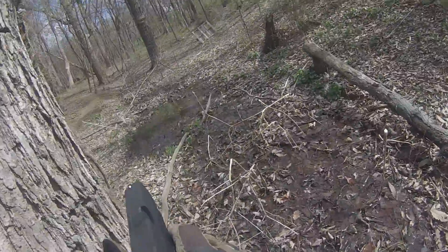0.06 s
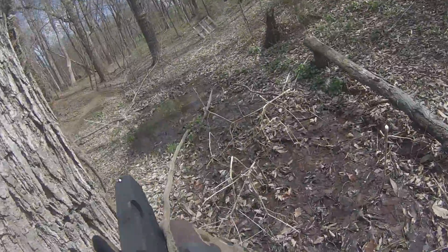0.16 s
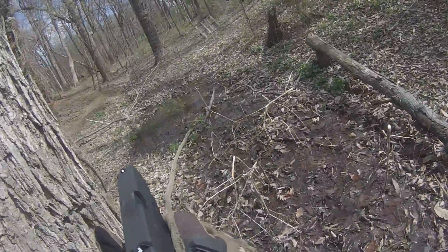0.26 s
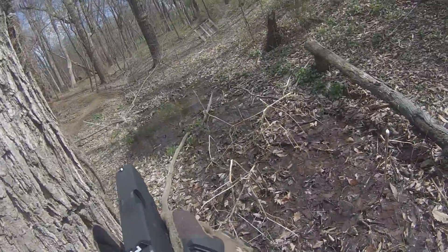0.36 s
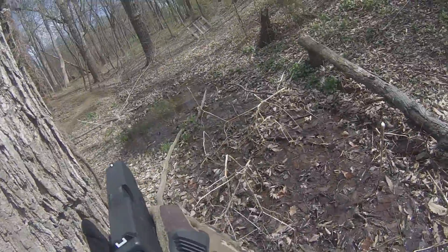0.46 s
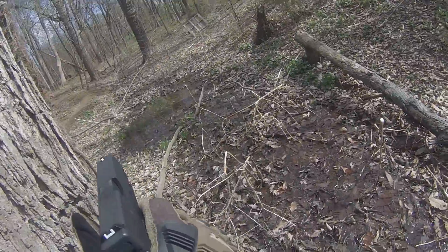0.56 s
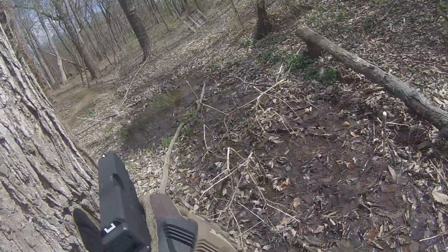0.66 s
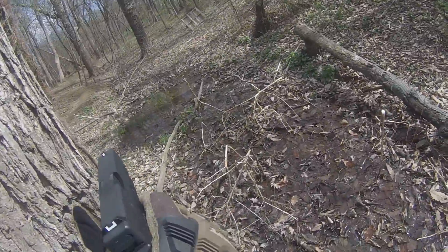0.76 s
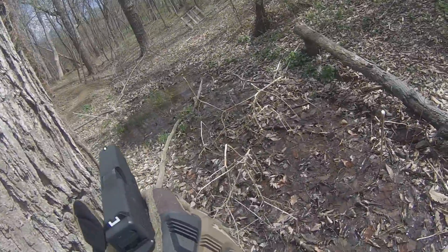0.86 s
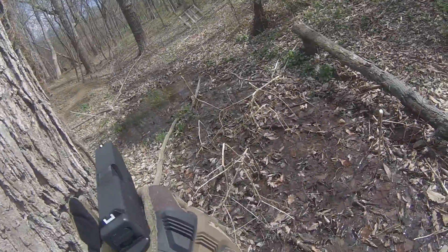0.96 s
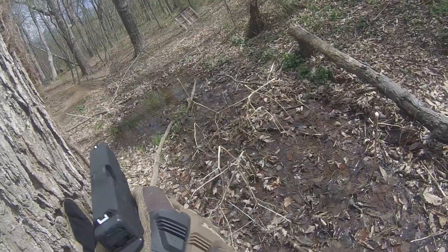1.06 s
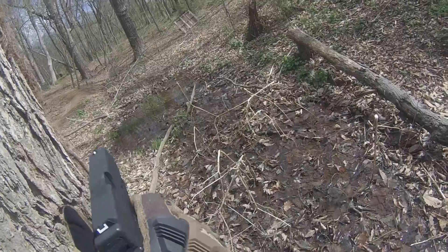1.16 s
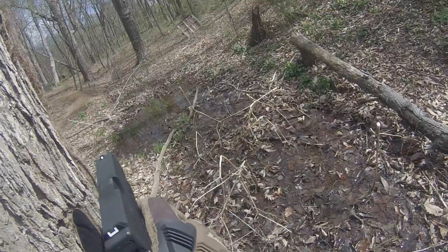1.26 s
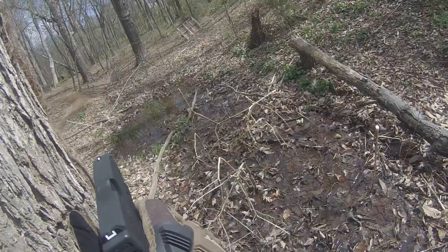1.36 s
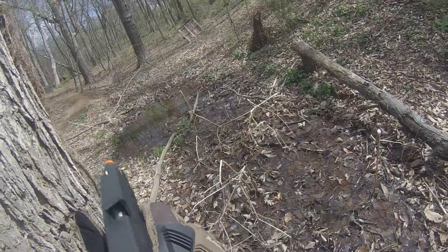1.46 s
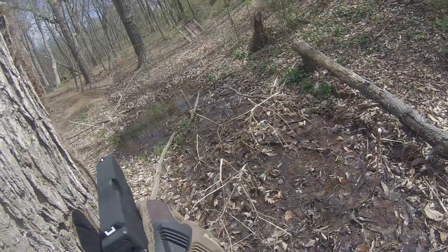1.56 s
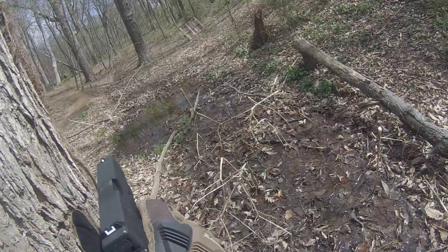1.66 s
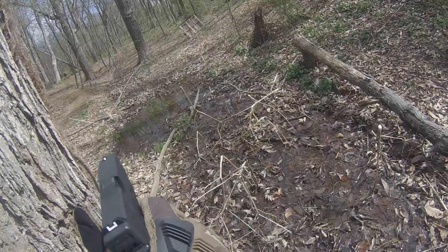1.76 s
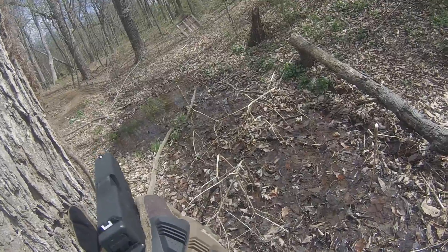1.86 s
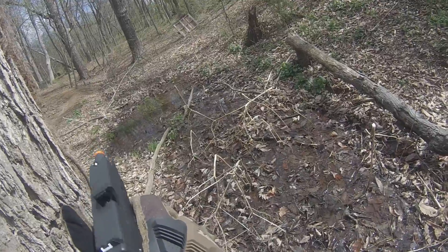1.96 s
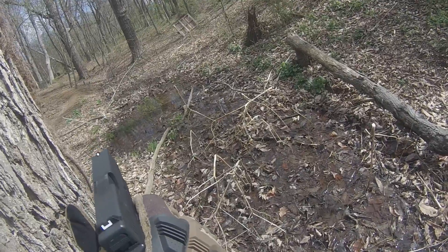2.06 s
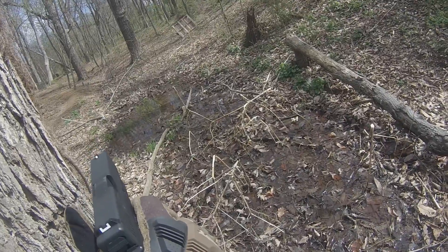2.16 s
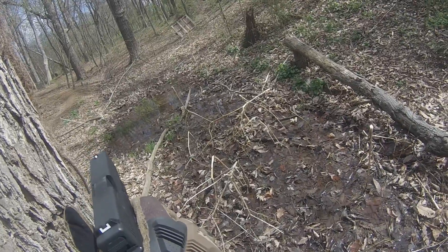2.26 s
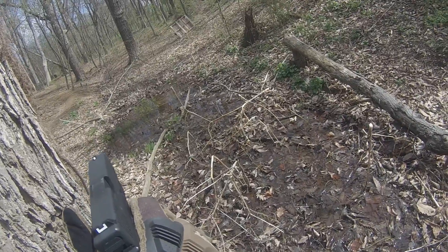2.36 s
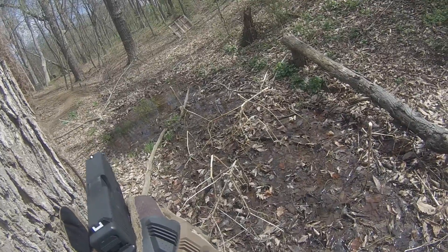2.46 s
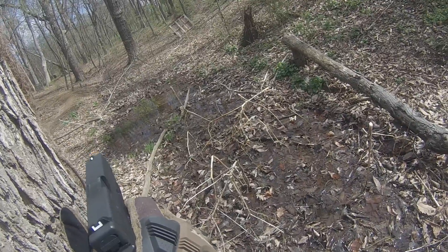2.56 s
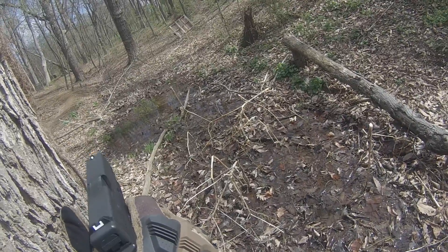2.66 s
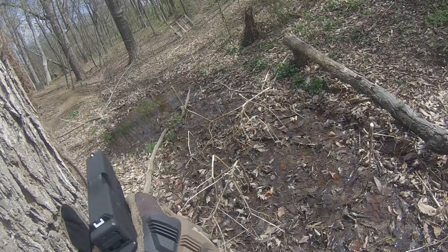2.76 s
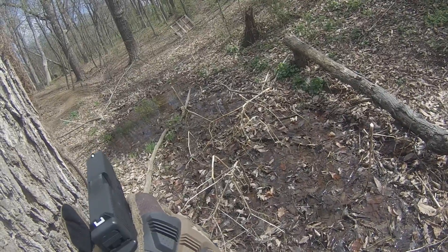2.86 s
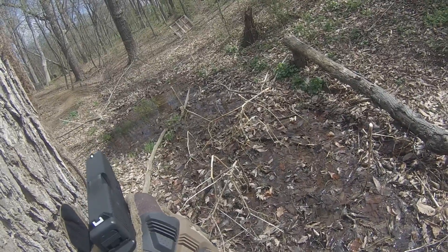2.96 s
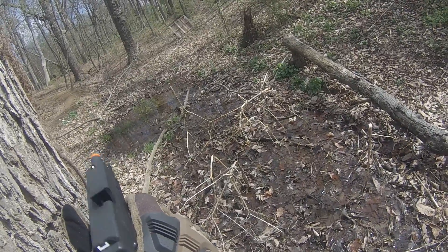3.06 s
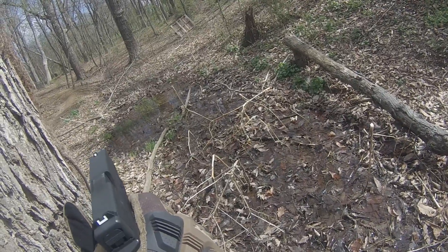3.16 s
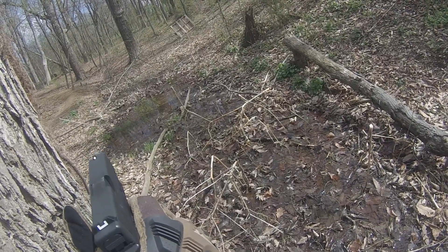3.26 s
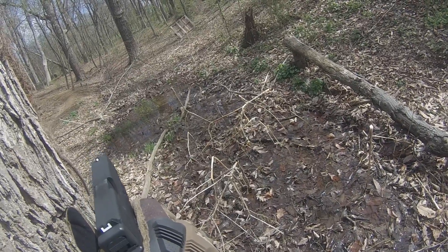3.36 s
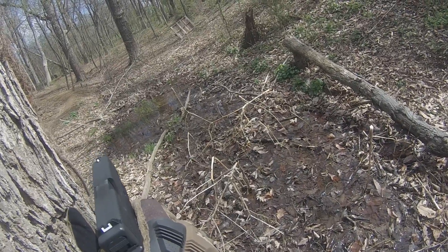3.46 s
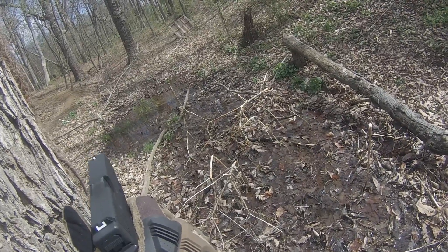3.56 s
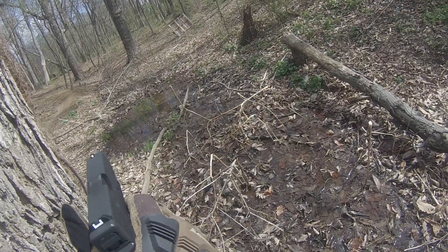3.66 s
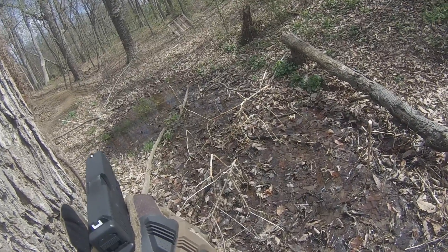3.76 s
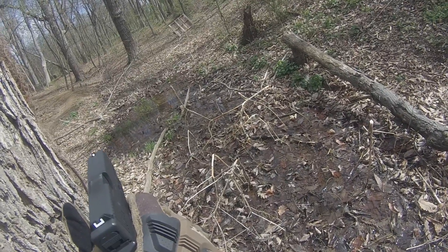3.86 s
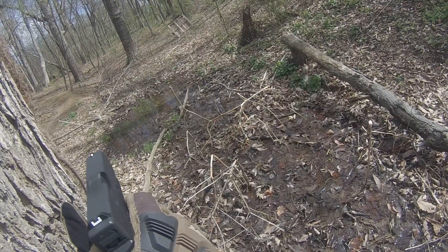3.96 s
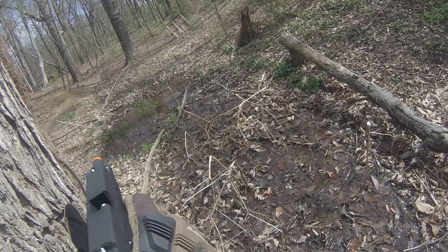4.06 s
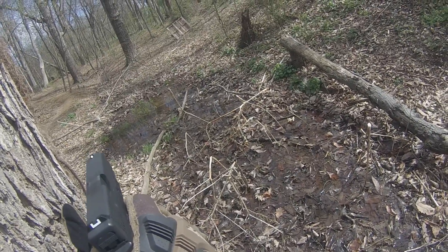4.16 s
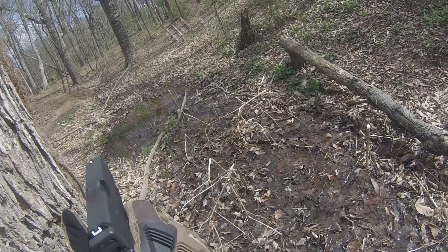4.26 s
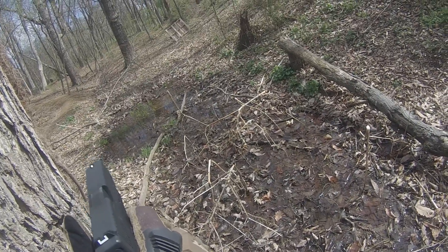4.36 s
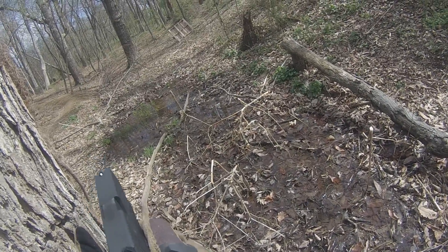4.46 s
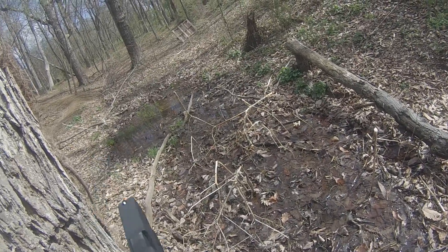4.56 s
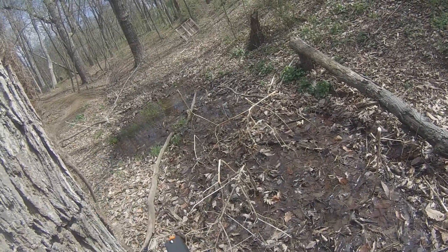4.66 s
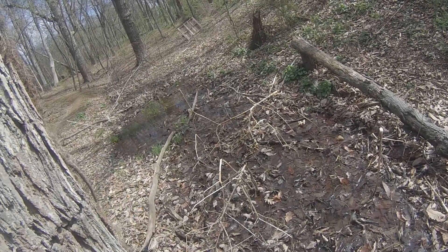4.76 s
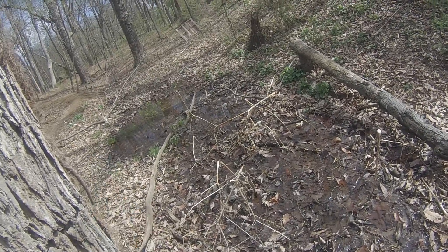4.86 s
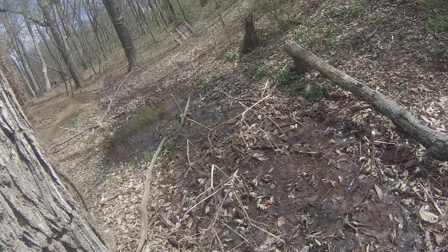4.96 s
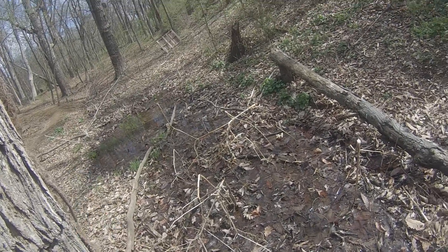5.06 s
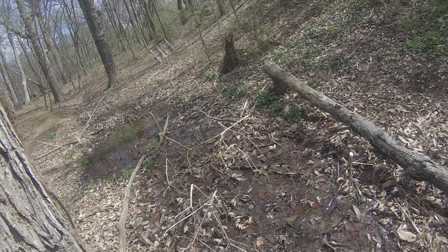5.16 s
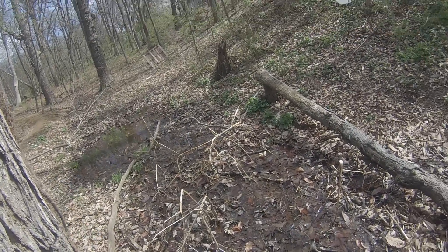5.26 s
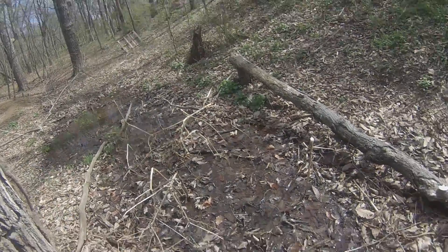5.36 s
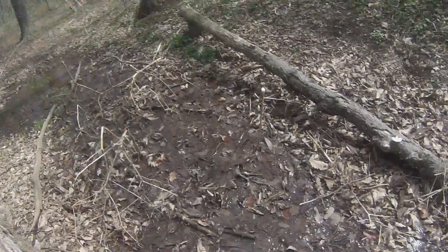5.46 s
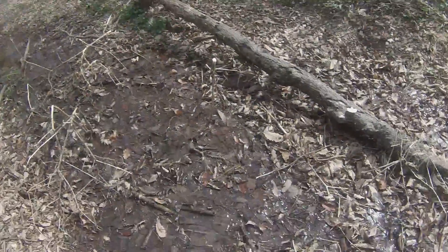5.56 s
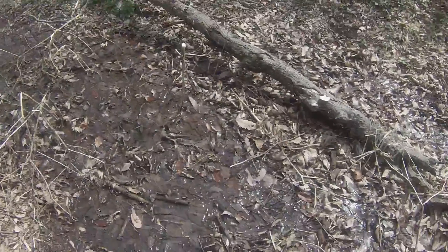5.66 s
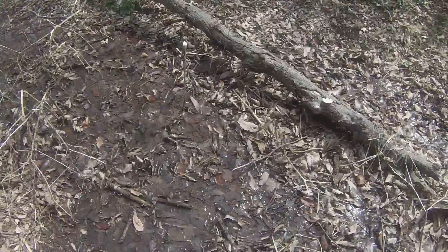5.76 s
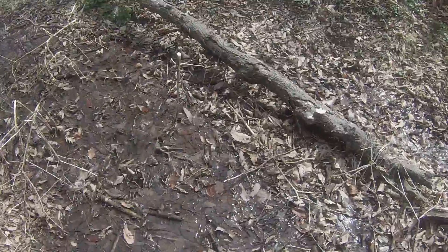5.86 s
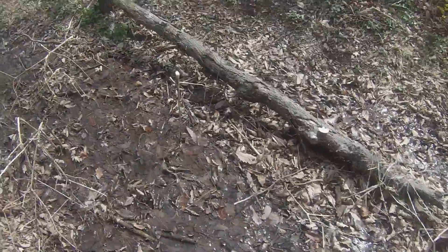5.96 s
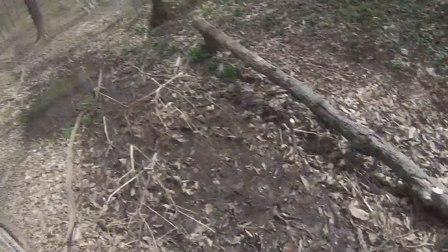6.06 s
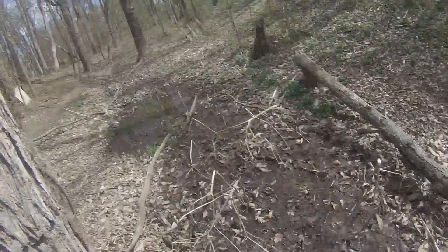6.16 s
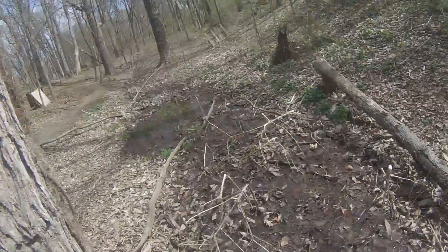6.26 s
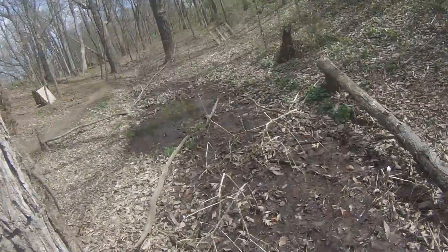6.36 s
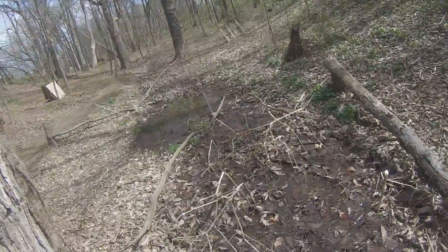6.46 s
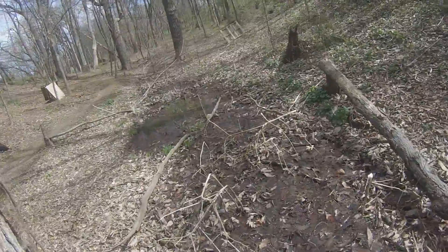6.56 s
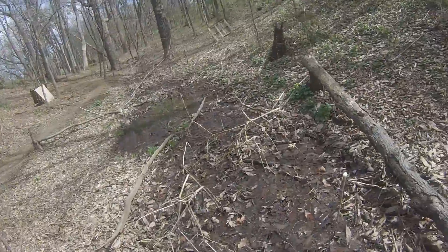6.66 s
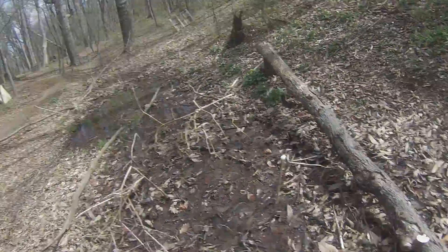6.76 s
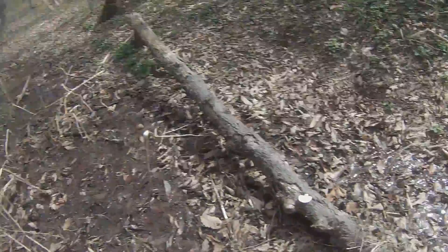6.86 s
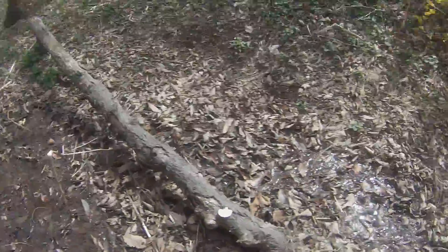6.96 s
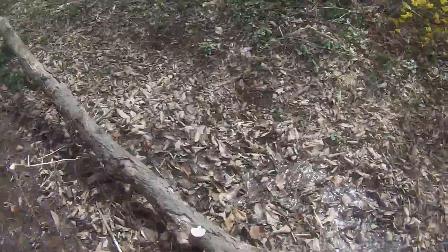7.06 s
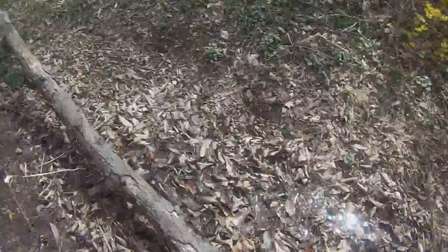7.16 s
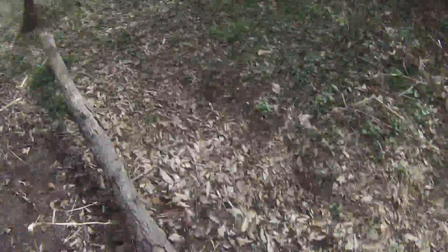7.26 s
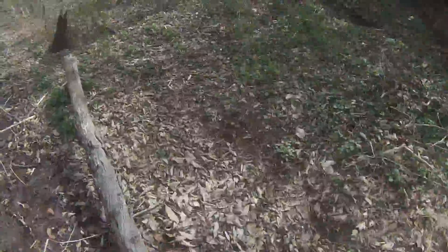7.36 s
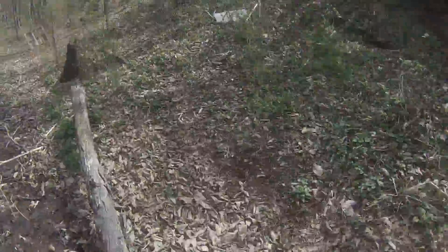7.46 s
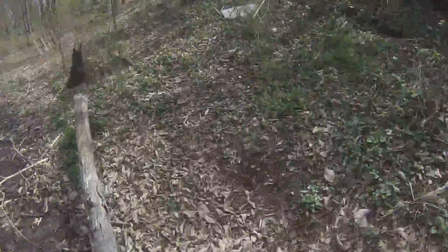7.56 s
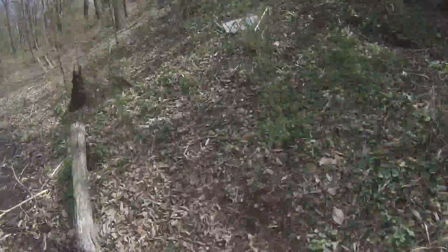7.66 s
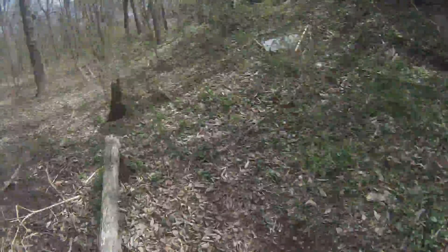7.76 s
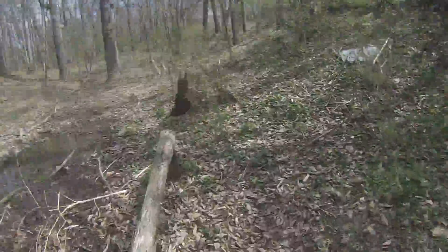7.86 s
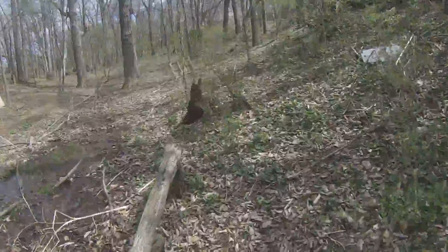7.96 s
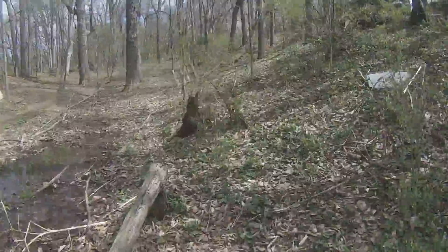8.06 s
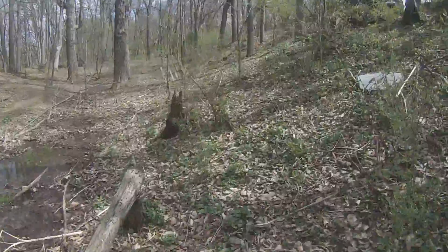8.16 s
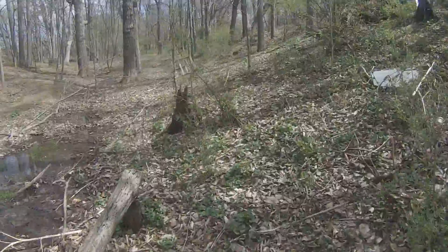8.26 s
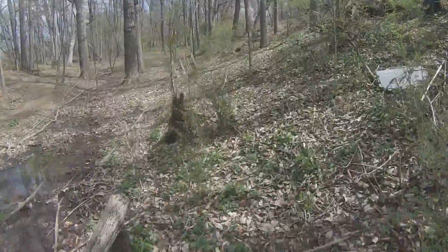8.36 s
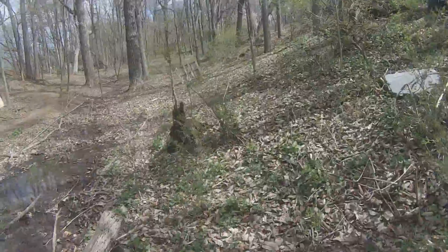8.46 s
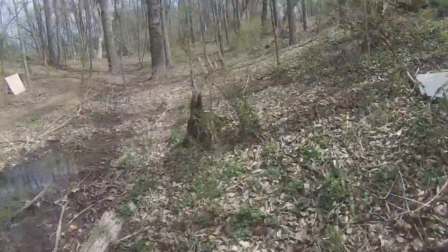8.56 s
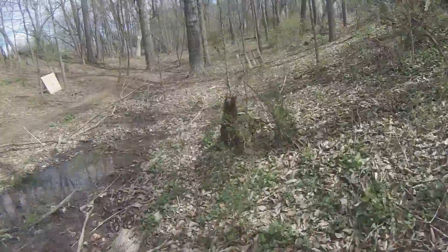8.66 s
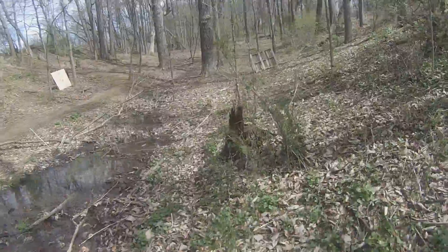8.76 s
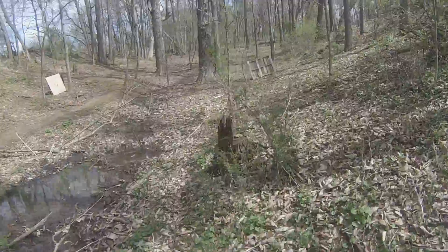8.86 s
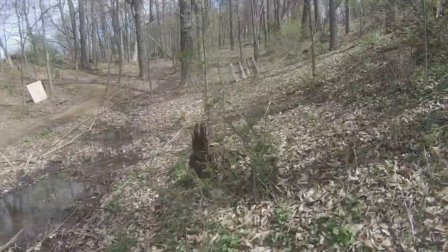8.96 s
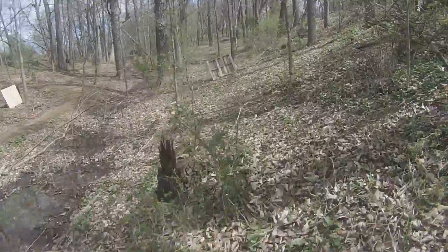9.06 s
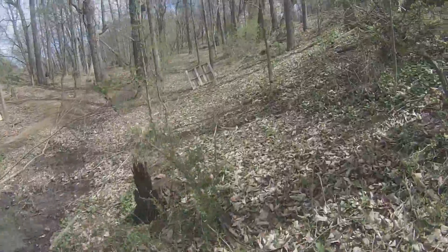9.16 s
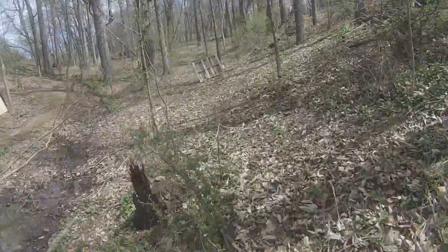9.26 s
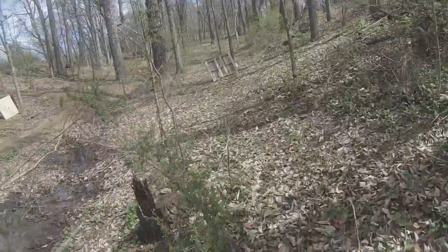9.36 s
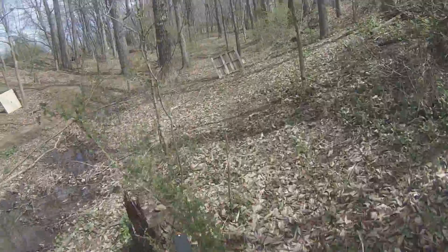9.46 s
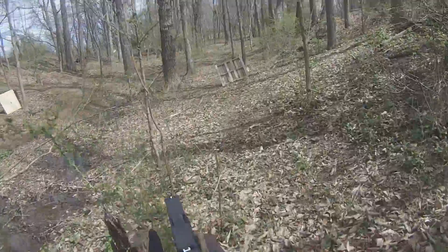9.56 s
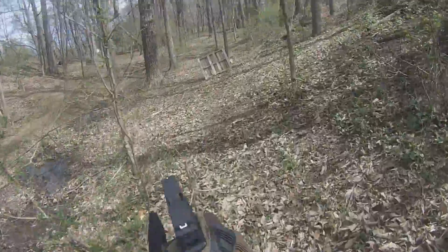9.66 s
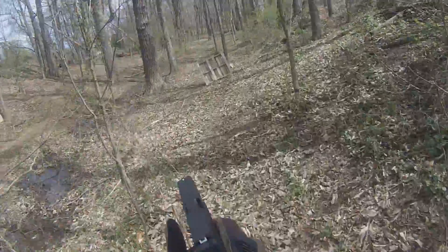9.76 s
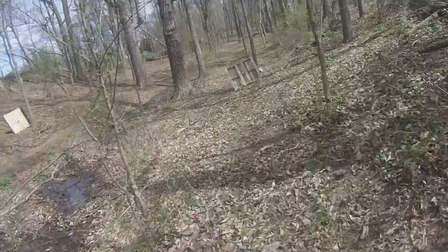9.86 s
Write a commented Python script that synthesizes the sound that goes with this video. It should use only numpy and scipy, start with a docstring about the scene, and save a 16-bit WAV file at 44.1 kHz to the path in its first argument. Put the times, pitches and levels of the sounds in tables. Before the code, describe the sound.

Close to a body-worn microphone, gear knocks softly before a gas pistol pops six times over about three seconds, its slide clacking quickly after each pop and the trees returning a very faint tail. Dry clicks intrude. Then cloth scrapes, leaves crackle underfoot and hard gear bangs and rattles with running strides, heavy and distorted to the end.

```python
"""Light knocks of worn gear and dry ticks come first, then a gas airsoft pistol fires six shots from behind a tree.
Each shot is a gas pop and two clacks of the slide: noise bursts through resonances, with a faint answer from the woods.
The player then runs off over dry leaves: micro-slips crackle and rub, and jolts set worn gear thumping and clattering
against the body-worn microphone. Electric-sounding ticks are flat pulses on a strict beat; woodland air is steady noise."""
import sys
import numpy as np
from scipy import signal
from scipy.fft import rfft, irfft
from scipy.io import wavfile
from scipy.ndimage import uniform_filter1d

SR = 44100
rng = np.random.default_rng(int(sys.argv[2]) if len(sys.argv) > 2 else 0)


def store_wav(level_fs):
    """Save 16-bit WAV to argv[1]."""
    pcm = np.round(np.clip(np.atleast_2d(level_fs), -1, 1) * 32767)
    wavfile.write(sys.argv[1], SR, pcm.T.astype(np.int16))


N = 437031
HIT = np.arange(8192) / SR  # time since a blow, s
TIME = np.arange(N) / SR  # time in the scene, s

# Pistol shots. Each row: start in seconds, gas pop in dB, delay of the slide's rear stop in ms and its level in dB,
# delay of the slide slamming shut in ms and its level in dB, metal ring in dB, nominal recoil clack of the gear in dB.
SHOTS = [(1.1147, -11, 9.9, -14, 57.7, -21.5, -47, -25),
         (1.4734, -10.5, 12.3, -16.5, 56.3, -22.5, -43, -25.5),
         (1.9514, -12, 12.8, -17.5, 55, -21.5, -41.5, -31.5),
         (2.518, -11, 12.9, -17.5, 51.2, -20, -48, -30.5), (3.0610, -12, 14, -20, 47.3, -24, -27, -27.5),
         (4.0350, -13, 13, -19, 50.3, -23, -45, -38)]
# Spectrum of the closing slide, also lent to the pellets. Each row: frequency in Hz, relative level in dB.
SHUT_SPECTRUM = [(200, -23.5), (700, -21.5), (1100, -12.5), (1600, -9.5), (2400, -4.5), (3600, -1.5),
                 (4700, -2), (6500, -9), (8200, -13.5), (10000, -5), (11800, -19.5), (12800, -10.5),
                 (14000, -19.5), (16000, -26.5)]
# Resonances of the plastic housing. Each row: nominal frequency in Hz, width in Hz, nominal level in dB.
HOUSING = [(246, 136, 8), (472, 300, -4), (726, 46, 6.5), (954, 460, 0.5), (1168, 250, 4), (1276, 87, 3.5),
           (1625, 84, -8.5), (2124, 110, 5), (3020, 210, -5), (3600, 500, -23)]
# Spectrum of scraping straps and cloth. Each row: frequency in Hz, relative level in dB.
SCRAPE_SPECTRUM = [(150, -16.5), (700, -5.5), (1150, 2), (1650, 7.5), (2200, 4.5), (2600, -5.5), (3100, -4),
                   (4000, -26.5), (6000, -29.5), (14000, -44.5)]
# Strides, the first three only shifts of weight. Each row: start in seconds, length in seconds, then levels in dB
# of leaves, rubbing gear, low sway and ticking.
STRIDES = [(5.886, 0.38, -74, -63.5, -53, -43.5), (6.733, 0.096, -69, -55, -39, -32.5),
           (6.97, 0.21, -58, -62, -55, -23.5), (7.221, 0.3, -59, -48, -35, -23),
           (7.597, 0.34, -55.5, -45.5, -36.5, -31.5), (8.001, .21, -58.5, -46, -33, -19.5),
           (8.361, 0.17, -58.5, -49, -36.5, -23), (8.741, .125, -50.5, -46.5, -32, -17.5),
           (9.083, 0.24, -47, -48, -37.5, -19), (9.465, 0.2, -55.5, -45.5, -34.5, -27.5),
           (9.838, 0.073, -54.5, -43, -39, -24.5)]
STRIDE_ATTACK_S, STRIDE_RELEASE_S = 0.011, 0.025
TICK_BEAT_S, TICK_START_S = 1024 / 48000, 0.7876  # spacing of the beats; start of the beat grid
TICK_WIDTH_MS = 0.24  # typical width of the lesser ticks


def pistol():
    """Impulsive excitation of resonators: the hammer strikes the valve, gas throws the slide back, a spring shuts it."""
    # Spectrum of gas leaving the barrel. Each row: frequency in Hz, relative level in dB.
    pop_spectrum = [(88, -47), (150, -18.5), (871, -24), (1600, -8.5), (1980, -21), (2360, -3), (3290, -3),
                    (4000, -10.5), (4670, -8), (5250, -18.5), (5680, -12.5), (8230, -13), (11500, -18.5),
                    (13200, -24), (16000, -39.5)]
    # Resonances of barrel and gas chamber. Each row: frequency in Hz, width in Hz, level in dB.
    barrel = [(262, 180, 0.5), (2350, 540, -0.5), (3114, 300, 0), (3600, 480, -4), (4680, 530, 2),
              (5630, 160, 4), (6370, 72, 1.5), (7270, 240, -1), (8850, 410, -4.5), (10800, 2400, -1),
              (12650, 500, -6)]
    # Spectrum of the slide at its rear stop. Each row: frequency in Hz, relative level in dB.
    rear_spectrum = [(88, -48), (150, -16.5), (805, -10), (1630, -8), (2020, -10.5), (3490, 1.5),
                     (3920, -7.5), (4760, -8), (5150, -11.5), (6140, -11.5), (8400, -18.5), (10200, -12.5),
                     (11500, -22.5), (14500, -26), (16000, -47)]
    # Ringing metal of the slide. Each row: nominal frequency in Hz, relative level in dB, t60 in seconds.
    metal = [(3547, -4, .1), (4317, -8.5, 0.1), (5460, -2.5, 0.07), (6800, -2, 0.063), (10000, -1.5, 0.069),
             (10337, -2, 0.069)]
    out = np.zeros(N)
    for s, pop_db, rear_ms, rear_db, shut_ms, shut_db, ring_db, _ in SHOTS:
        rear_s = s + rear_ms / 1000
        shut_s = s + shut_ms / 1000

        hammer = burst(hold_ms=1.5, decay_ms=1.2, tail_db=-31, tail_ms=5)
        add(out, s - 0.0025, strike_frame(hammer, rear_spectrum, db=-41))

        gas = burst(hold_ms=2.4, decay_ms=0.9, tail_db=-8, tail_ms=9.9)
        gas_in_barrel = 0.18 * gas + resonate(gas, barrel)
        add(out, s, blow(colour(gas_in_barrel, pop_spectrum), pop_db))

        stop = burst(hold_ms=2.5, decay_ms=4.2, tail_db=-12, tail_ms=15)
        add(out, rear_s, strike_frame(stop, rear_spectrum, rear_db))

        # the slide drags over the magazine just before it closes
        drag = burst(hold_ms=3, decay_ms=2.9, tail_db=-19, tail_ms=8.7)
        add(out, shut_s - 0.009, strike_frame(drag, SHUT_SPECTRUM, db=-30.5))

        slam = burst(hold_ms=2.5, decay_ms=1.4, tail_db=-12.5, tail_ms=11)
        add(out, shut_s, strike_frame(slam, SHUT_SPECTRUM, shut_db))
        add(out, shut_s, blow(ring(metal, detune=0.002), ring_db))
    return out


def strike_frame(push, spectrum, db):
    """Forced resonance: a blow is heard directly and through the ringing frame."""
    # Resonances of the frame under the slide. Each row: frequency in Hz, width in Hz, level in dB.
    frame = [(1720, 310, 0.5), (2970, 200, -5.5), (3540, 490, -1), (4500, 360, 2.5), (5587, 69, 2.5),
             (6260, 200, 1), (7550, 640, 0.5), (9800, 980, -2.5), (11100, 250, 2.5), (12700, 600, 1.5)]
    return blow(colour(0.33 * push + resonate(push, frame), spectrum), db)


def woods(x, t60, wet_db):
    """Multiple scattering: the trunks return a thin, dull tail, a convolution with decaying noise."""
    # Spectrum of what the trees send back. Each row: frequency in Hz, relative level in dB.
    tree_spectrum = [(200, -8), (1200, 3.5), (2400, -4), (2700, -8.5), (3200, -2), (3600, 2.5),
                     (4050, -6.5), (4600, -6.5), (5600, 0), (6300, -6), (12000, -11), (16000, -24.5)]
    t = TIME[:SR]
    envelope = undb(-60 * t / t60) * (1 - np.exp(-t / 0.015))
    echoes = colour(rng.standard_normal(SR) * envelope, tree_spectrum)
    return undb(wet_db) * signal.fftconvolve(x, echoes / np.linalg.norm(echoes))[:N]


def gear():
    """Impact and rebound: recoil and footfalls jolt the worn gear, harder landings repeat, strides add light knocks."""
    # Jolts of the worn gear. Each row: start in seconds, nominal clack in dB, nominal thump in dB, brightness in dB.
    landings = [(.038, -41.5, -42.5, -1), (.318, -32.5, -35.5, -14.5), (.462, -37, -39, -12),
                (5.29, -19.5, -38, -15), (5.333, -18.5, -23, -11.5), (6.118, -31, -34.5, 3),
                (6.206, -36.5, -32.5, 3), (6.724, -35.5, -31.5, -4), (6.789, -21, -30, 1),
                (6.912, -21, -32, -20), (7.237, -14.5, -29, -1.5), (7.269, -1, -22.5, 1),
                (7.312, -20, -28, -20), (7.351, -1.5, -18, -12), (7.486, -9.5, -21.5, -1),
                (7.619, -7.5, -14, -1.5), (7.769, -3.5, -18, -0.5), (7.835, -7.5, -16.5, 0),
                (7.865, -14, -25.5, -13), (8.006, -11, -27, -6), (8.046, 1, -17.5, -2.5),
                (8.061, -7.5, -22, -18), (8.103, 3, -17, -5.5), (8.187, -10, -21.5, -6),
                (8.195, -11, -26, -5), (8.366, -4.5, -15.5, -8.5), (8.487, -4.5, -30, -13),
                (8.719, -18, -33.5, -3), (8.764, -13.5, -24, -12), (8.828, -4, -18, -7),
                (9.083, -9.5, -38, -12), (9.094, -6.5, -11, -8.5), (9.115, -11.5, -17, -16),
                (9.187, -11.5, -21.5, -8), (9.44, -19, -32.5, -10), (9.505, -.5, -15.5, -6.5),
                (9.559, 1.5, -20, -2.5), (9.619, -14, -21.5, -12), (9.836, -13.5, -20.5, -8.5)]
    # Nominal clack levels in dB at which the rebound sets in and is full.
    rebound_range = [-28.5, -5.5]
    recoil_s, recoil_bright_db = 0.096, -3  # delay until the kick reaches the gear; brightness
    # the recoil thump grows more slowly than its clack: dB at a 0 dB clack, dB per dB
    recoil_thump_db, recoil_thump_slope = -20, 0.6
    rebound_s, rebound_clack_db, rebound_thump_db = 0.011, -9, -6  # base delay; levels relative to the landing
    chatter_s, chatter_clack_db, chatter_thump_db = 0.05, 23, 14.5  # mean spacing; mean levels over the rubbing
    out = np.zeros(N)
    for s, *_, clack_db in SHOTS:
        thump_db = recoil_thump_db + recoil_thump_slope * clack_db
        add(out, s + recoil_s, jolt(clack_db, thump_db, recoil_bright_db))

    for s, clack_db, thump_db, bright_db in landings:
        # the load shifts and brushes the housing just before it lands
        brush = burst(hold_ms=10, decay_ms=2.5, tail_db=-39.5, tail_ms=5)
        add(out, s - 0.007, blow(resonate(brush, HOUSING), clack_db - 37))
        add(out, s, jolt(clack_db, thump_db, bright_db))
        again = jolt(clack_db + rebound_clack_db, thump_db + rebound_thump_db, bright_db)
        rebound_gain = np.interp(clack_db, rebound_range, [0, 1])
        add(out, s + rebound_s * rng.uniform(0.8, 1.4), again * rebound_gain)

    for s, length, _, rub_db, _, _ in STRIDES[3:]:
        for k, (late, clack, thump) in enumerate(rng.uniform(-1, 1, (8, 3))):
            after = chatter_s * (k + 0.5 + late / 2)
            clack_db = rub_db + chatter_clack_db + 4 * clack
            thump_db = rub_db + chatter_thump_db + 4 * thump
            knock = jolt(clack_db, thump_db, bright_db=-14.5)
            add(out, s + after, knock * (after < length))  # only within the stride
    return out


def jolt(clack_db, thump_db, bright_db):
    """Mass on a stiffening spring: the housing bounces on its mount while loose plastic chatters against it."""
    # Modes of the soft mount. Each row: nominal frequency in Hz, relative level in dB, nominal t60 in seconds.
    mount = [(58.4, -6.5, 0.22), (94.3, 7, 0.087), (130, -0.5, 0.047), (225.3, -10.5, 0.064)]
    spot_detune, spot_db = 0.036, 3.5  # spread of the housing's resonances: fraction of frequency, dB
    contacts = burst(hold_ms=0.9, decay_ms=2.93, tail_db=-23, tail_ms=12.5)
    contacts *= undb(2 * rng.standard_normal(len(HIT)))  # a few hard contacts among many soft ones

    # every jolt lands on another spot, which shifts and reweights the resonances
    spot = []
    for hz, width, db in HOUSING:
        spot_hz = hz * (1 + spot_detune * rng.standard_normal())
        spot.append((spot_hz, width, db + spot_db * rng.standard_normal()))
    brightness = [(1400, 0), (3000, bright_db), (5000, bright_db - 15.5), (12000, bright_db - 24.5)]
    clack = colour(resonate(contacts, spot), brightness)

    # the mount stiffens under load, so light jolts ring lower and longer
    stiffness = np.interp(thump_db, [-38.5, -25, -17, -10.5], [0.68, 1.02, 1.03, 1.45])
    modes = [(hz * stiffness, db, t60 / stiffness) for hz, db, t60 in mount]
    swing_up = 1 - np.exp(-HIT / 0.0016)  # the soft mount takes a moment to move
    swing = ring(modes, detune=0.1) * swing_up
    return blow(clack, clack_db - 13) + blow(swing, thump_db + 6.5)


def movement():
    """Stick-slip friction: at each stride leaves swish, crackle and settle, gear rubs, and the mount sways low."""
    # Spectra of dry leaves, rubbing gear and the swaying mount. Each row: frequency in Hz, relative level in dB.
    leaf_spectrum = [(300, -0.5), (2000, 5.5), (4200, 5.5), (7000, -8.5), (14000, -9.5), (16000, -9)]
    rub_spectrum = [(100, -8.5), (400, 0), (900, 3), (1400, 7), (2300, -11.5), (3300, -20.5), (5000, -23.5),
                    (12000, -47)]
    sway_spectrum = [(15, -9), (40, -8), (90, 0.5), (150, -15.5), (300, -24), (900, -46), (3000, -79)]
    wash_db = -8  # smooth hiss of sliding leaves, relative to the crackle
    swish_db, swish_lead_s, swish_width_s = -16, 0.024, 0.043  # relative to the crackle; lead; Gaussian width
    settle_db, settle_s = -11.5, 0.09  # leaves stirring around each stride: relative to the crackle; release
    _, _, leaves_db, rub_db, sway_db, _ = np.transpose(STRIDES)

    crush = slips(leaf_spectrum, grain_db=15.5, surge_db=23)
    crush *= pressure(leaves_db, STRIDE_ATTACK_S, STRIDE_RELEASE_S)
    settle = slips(leaf_spectrum, grain_db=10, surge_db=8)
    settle *= pressure(leaves_db + settle_db, attack_s=0.099, release_s=settle_s)

    cloth = undb(-5) * slips(rub_spectrum, grain_db=12, surge_db=-1)
    cloth += undb(-7) * slips(SCRAPE_SPECTRUM, grain_db=18, surge_db=11)
    rub = cloth * pressure(rub_db, STRIDE_ATTACK_S, STRIDE_RELEASE_S)
    sway = slips(sway_spectrum, grain_db=2, surge_db=2)
    sway *= pressure(sway_db, attack_s=0.016, release_s=0.025)

    # the foot sweeps through the leaves just before it lands
    sweep = np.zeros(N)
    for s, _, db, *_ in STRIDES[3:]:
        sweep += undb(db + swish_db) * np.exp(-((TIME - s + swish_lead_s) / swish_width_s) ** 2)
    slide = pressure(leaves_db + wash_db, STRIDE_ATTACK_S, STRIDE_RELEASE_S)
    wash = slips(leaf_spectrum, grain_db=8, surge_db=3) * (sweep + slide)
    return wash + crush + settle + rub + sway


def pressure(levels_db, attack_s, release_s):
    """Load envelope: each stride swells, holds while the foot bears weight, and dies away exponentially."""
    total = np.zeros(N)
    for (s, length, *_), db in zip(STRIDES, levels_db):
        swell = np.minimum(TIME - s, 0) / attack_s
        fade = np.maximum(TIME - s - length, 0) / release_s
        total += undb(db) * np.exp(swell - fade)
    return total


def slips(spectrum, grain_db, surge_db, size=32):
    """Stick-slip noise: dense uneven micro-slips come in surges, coloured by the material."""
    grains = np.repeat(rng.uniform(-1.5, 1.5, N // size + 1), size)[:N]
    surge_steps = np.repeat(rng.uniform(-1.5, 1.5, N // 800 + 1), 800)
    surges = uniform_filter1d(surge_steps, 400)[:N]
    strength = undb(grain_db * grains + surge_db * surges)
    return unit(colour(strength * rng.standard_normal(N), spectrum))


def scuffs(grain_db, release_ms):
    """Dry friction: straps and cloth scrape in short spells of micro-slips, strongest as the grip first lets go."""
    # Scrapes of straps and cloth. Each row: start in seconds, level in dB, length in ms.
    scrapes = [(5.600, -40.5, 13.3), (6.0415, -31.5, 3), (6.052, -35, 12.6), (6.684, -39.5, 4),
               (7.525, -34.5, 14), (7.578, -38.5, 31), (7.675, -48, 110), (7.725, -37, 20), (8.02, -31, 17),
               (8.455, -38, 11), (9.475, -34.5, 15), (9.616, -26, 7.1), (9.63, -40, 11)]
    out = np.zeros(N)
    ms = HIT * 1000
    for s, db, length_ms in scrapes:
        strength = undb(grain_db * np.repeat(rng.uniform(-1.5, 1.5, len(HIT) // 32), 32))
        grains = unit(colour(strength * rng.standard_normal(len(HIT)), SCRAPE_SPECTRUM))
        first_grip = 1 + 0.23 * np.exp(-ms / 3)
        fade = np.exp(-np.maximum(ms - length_ms, 0) / release_ms)
        add(out, s, undb(db) * grains * first_grip * fade)
    return out


def ticks():
    """Periodic pulses thinned at random: loud single ticks with faint trails, and runs of ticks during strides."""
    # Single ticks that stand out. Each row: start in seconds, pulse height in dB, width in ms, rebound from 0 to 1.
    single_ticks = [(0.1264, -41, 0.24, 0), (0.7875, -2.5, 0.048, 0), (.809, -36, 0.024, 0.2),
                    (0.8303, -12, 0.077, 1), (0.8943, -32.5, .68, 0.3), (1.2355, -23.5, 0.33, 0.13),
                    (1.6196, -16, 0.045, 0.75), (1.6411, -24, 0.13, 1), (1.705, -34, 0.32, 0.05),
                    (2.1957, -6.5, .08, 0.02), (2.281, -32.5, 0.25, 0), (2.7288, -14.5, .1, .1),
                    (2.7718, -11.5, 0.069, 0.97), (3.6927, -21, 0.065, .73), (3.7103, -1.5, 0.074, 0.9),
                    (5.0115, -27.5, .25, 0), (5.715, -28, 0.19, 0), (5.780, -30, 0.26, 0),
                    (6.4195, -27.5, .25, 0), (6.4622, -28, 0.16, 0.07), (6.676, -28.5, .25, 0),
                    (6.7598, -32, .21, 0.04), (6.9104, -20, 0.25, 0), (6.9316, -0.5, .24, 0),
                    (6.9747, -16.5, 0.2, 0), (7.0169, -22, 0.29, 0), (7.0382, -15, 0.27, 0.1),
                    (7.1023, -30.5, 0.33, 0), (7.1663, -15, 0.16, 0.1), (7.2715, -11.5, 0.25, 0.1),
                    (7.4221, -11.5, .24, 0), (7.6991, -10.5, .17, 0.1), (7.7208, -9.5, 0.234, 0),
                    (7.7636, -4, .1, 0.04), (7.7851, -6.5, 0.31, 0.4), (7.8486, -9, 0.331, 0.26),
                    (8.0409, -2.5, 0.25, 0), (8.0628, -12, .42, 0), (8.1901, -10.5, .12, 0),
                    (8.4891, -7, .25, 0.06), (8.7886, -8.5, 0.26, 0), (8.8311, -2, .23, 0.1),
                    (9.1076, -19, .24, 0), (9.1924, -15, .29, 0.2), (9.2356, -16.5, 0.26, 0),
                    (9.2781, -4, 0.44, 0), (9.3, -10.5, 0.32, 0)]
    width_octaves, scatter_db = 0.45, 5.5  # spread of the run ticks in width and level
    run_share = 0.8  # share of beats that tick during a stride
    trail_db, trail_share = -19, 0.28  # mean level under the limited single tick; share of beats
    out = np.zeros(N)
    for s, db, width_ms, rebound in single_ticks:
        add(out, s, tick(db, width_ms, rebound))
        for k, (chance, size) in enumerate(rng.random((3, 2)), 1):
            if chance < trail_share:
                faint_db = np.clip(db, -20, -10) + trail_db + 8 * (size - 0.5)
                add(out, s + k * TICK_BEAT_S, tick(faint_db, TICK_WIDTH_MS, 0))

    beats = np.arange(TICK_START_S, N / SR, TICK_BEAT_S)
    chances = rng.random(len(beats))
    spreads = rng.standard_normal((len(beats), 2))
    for beat, chance, (size, wide) in zip(beats, chances, spreads):
        for s, length, *_, db in STRIDES:
            if s <= beat < s + length and chance < run_share:
                width_ms = TICK_WIDTH_MS * 2 ** (width_octaves * wide)
                add(out, beat, tick(db + scatter_db * size, width_ms, 0))
    return out


def tick(db, width_ms, rebound):
    """Rectangular pulse with no ring; one that swings back at once loses its lows and sounds thin and bright."""
    n = np.arange(256)
    width = width_ms * SR / 1000  # in samples
    push = np.clip(width - n, 0, 1)
    whole = np.clip(2 * width - n, 0, 1)
    return undb(db) * (push - rebound * (whole - push))


def pellets():
    """Brief impact noise: faint taps of plastic pellets on wood, far off."""
    # Pellet landings. Each row: start in seconds, level in dB.
    taps = [(1.289, -53.5), (1.641, -48), (3.251, -53.5), (4.236, -54.5)]
    out = np.zeros(N)
    for s, db in taps:
        tap = burst(hold_ms=1.8, decay_ms=1.8, tail_db=-29, tail_ms=12)
        add(out, s, blow(colour(tap, SHUT_SPECTRUM), db))
    return out


def air(level_db):
    """Stationary filtered noise: a quiet, even background of woodland air."""
    # Spectrum of still woodland air. Each row: frequency in Hz, relative level in dB.
    air_spectrum = [(12, -33.5), (20, -9), (36, -1.5), (55, -11), (168, -19), (357, -23.5), (434, -25),
                    (472, -24.5), (558, -25.5), (976, -28), (2460, -33), (3070, -33), (3950, -37),
                    (14700, -46.5), (16000, -55)]
    return unit(colour(rng.standard_normal(N), air_spectrum, size=8192)) * undb(level_db)


def undb(db):
    """Logarithmic level: decibels to amplitude gain."""
    return 10 ** (np.asarray(db) / 20)


def unit(x):
    """Power normalisation: scale to rms 1."""
    return x / np.sqrt(np.mean(x ** 2))


def blow(x, db):
    """Energy normalisation: scale a short sound to the energy of 10 ms at this rms level."""
    return x * undb(db) / np.sqrt(np.sum(x ** 2) / (0.01 * SR))


def add(track, s, x):
    """Superposition: mix a sound in at a time in seconds."""
    i = int(s * SR)
    track[i:i + len(x)] += x[:max(N - i, 0)]


def colour(x, points, size=2048):
    """Minimum-phase filtering through (Hz, dB) points: folding the cepstrum makes the response causal."""
    hz, db = np.transpose(points)
    bins_hz = np.fft.rfftfreq(size, 1 / SR)
    log_gain = np.log(undb(np.interp(np.log(bins_hz + 1), np.log(hz), db)))
    cepstrum = irfft(log_gain)
    cepstrum[1:size // 2] *= 2
    cepstrum[size // 2 + 1:] = 0
    response = irfft(np.exp(rfft(cepstrum)))
    return signal.fftconvolve(x, response)[:len(x)]


def resonate(x, peaks):
    """Modal superposition: parallel resonances given as (Hz, width in Hz, dB)."""
    return sum(undb(db) * signal.lfilter(*signal.iirpeak(hz, hz / width, fs=SR), x) for hz, width, db in peaks)


def ring(modes, detune):
    """Free decay of struck (Hz, dB, t60 in seconds) modes, a little detuned at every blow."""
    total = np.zeros(len(HIT))
    for hz, db, t60 in modes:
        mode_hz = hz * (1 + detune * rng.standard_normal())
        total += undb(db - 60 * HIT / t60) * np.sin(2 * np.pi * mode_hz * HIT)
    return total


def burst(hold_ms, decay_ms, tail_db, tail_ms):
    """Two-stage decay: noise holds briefly, collapses and leaves a weaker tail."""
    ms = HIT * 1000
    main = np.exp(-np.maximum(ms - hold_ms, 0) / decay_ms)
    tail = undb(tail_db) * np.exp(-ms / tail_ms)
    return (main + tail) * rng.standard_normal(len(HIT))


def scene():
    """Superposition of pistol, woods, pellets, moving player, ticks and air at one microphone."""
    shots = pistol()
    echo = woods(shots, t60=0.8, wet_db=-39)
    player = gear() + movement() + scuffs(grain_db=6, release_ms=4.7)
    return (shots + echo + pellets() + player + ticks() + air(level_db=-58.5))[None]


def record(dry):
    """Band limiting and saturation: deepest bass is blocked, peaks clip at full scale, the top is cut."""
    high_pass = signal.butter(1, 24, "high", fs=SR, output="sos")
    low_pass = signal.ellip(10, 0.2, 95, 15600, fs=SR, output="sos")
    clipped = np.clip(signal.sosfilt(high_pass, dry), -1, 1)
    return signal.sosfilt(low_pass, clipped)


dry = scene()
out = record(dry)
store_wav(out)
```